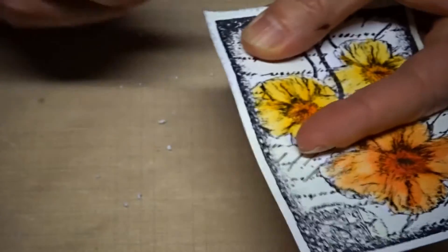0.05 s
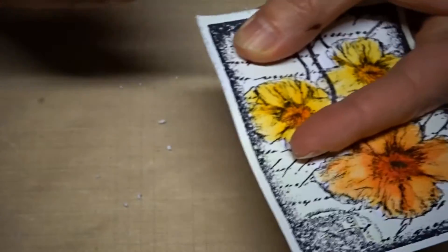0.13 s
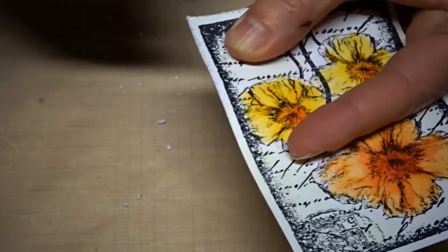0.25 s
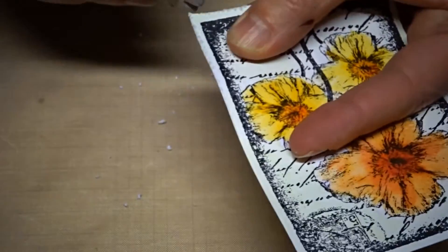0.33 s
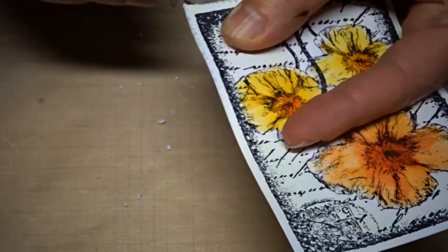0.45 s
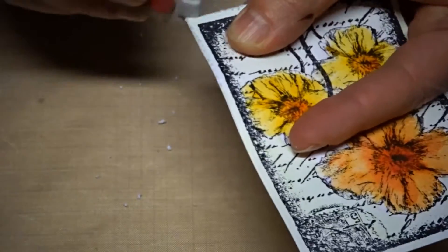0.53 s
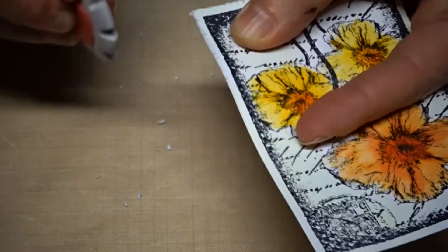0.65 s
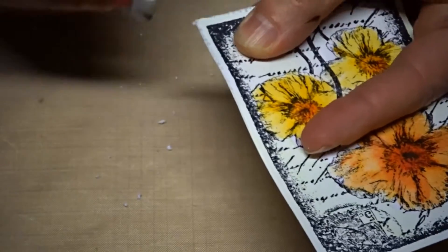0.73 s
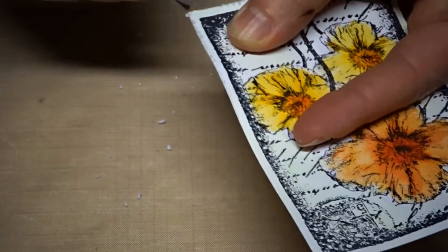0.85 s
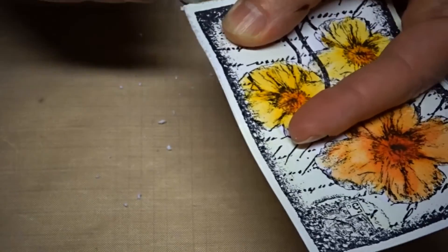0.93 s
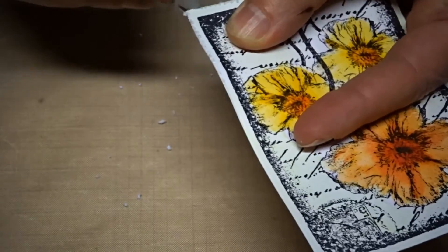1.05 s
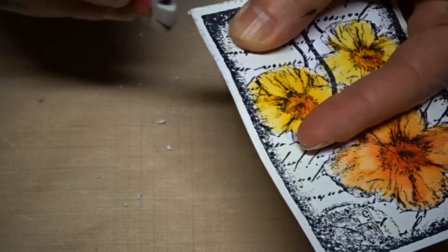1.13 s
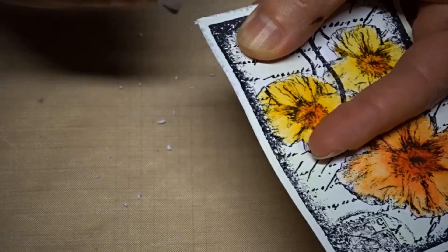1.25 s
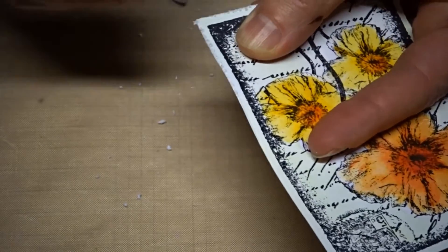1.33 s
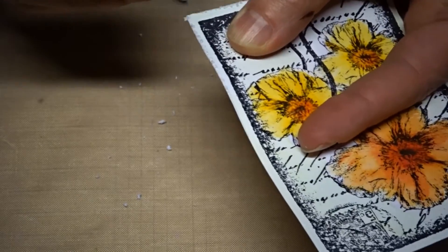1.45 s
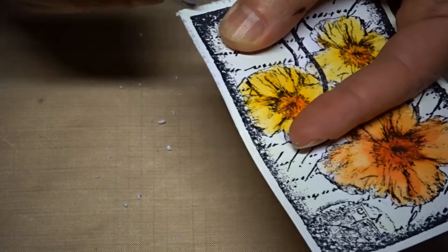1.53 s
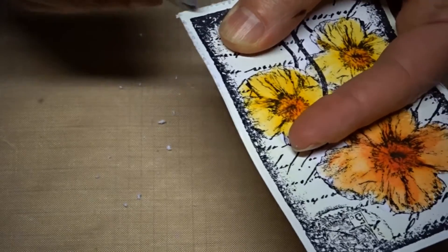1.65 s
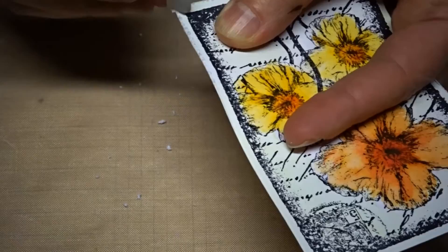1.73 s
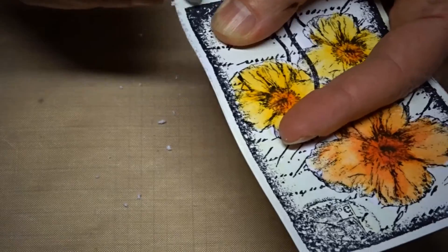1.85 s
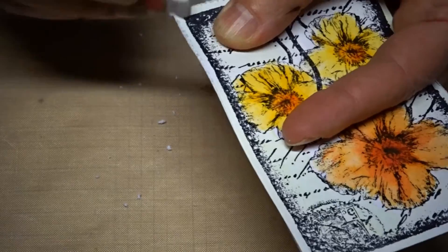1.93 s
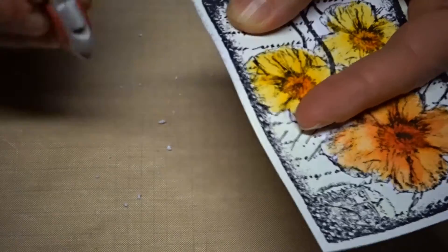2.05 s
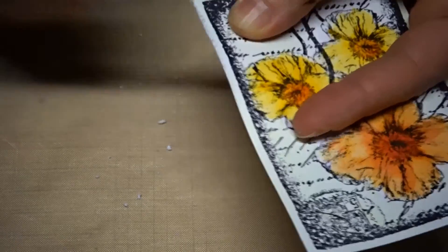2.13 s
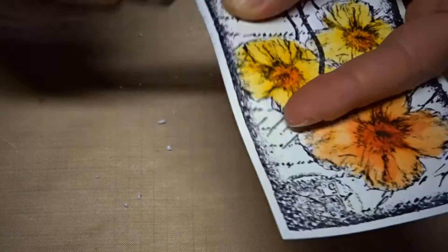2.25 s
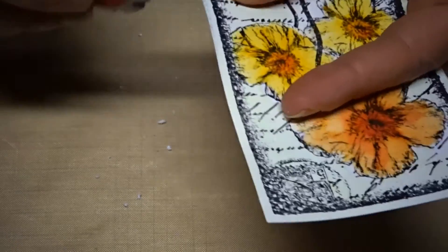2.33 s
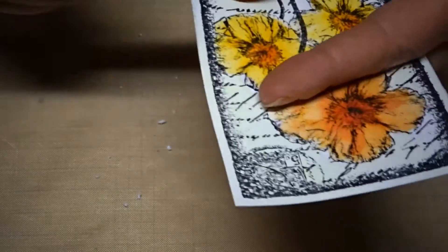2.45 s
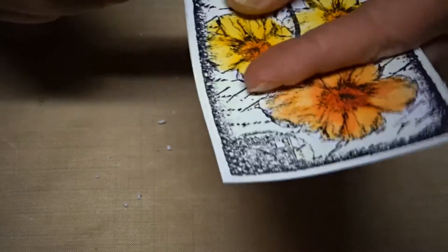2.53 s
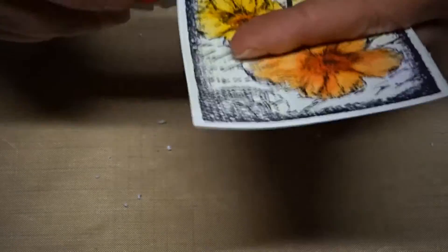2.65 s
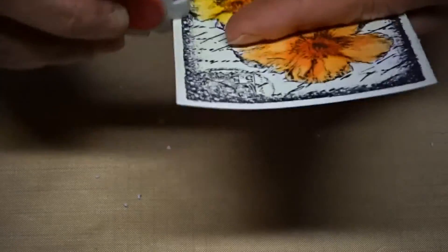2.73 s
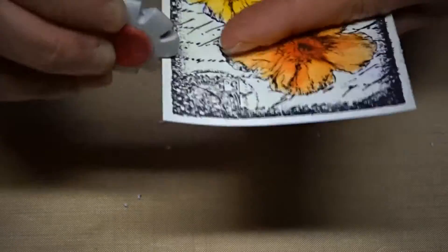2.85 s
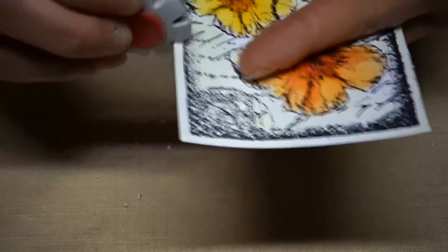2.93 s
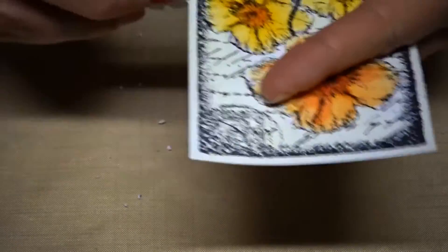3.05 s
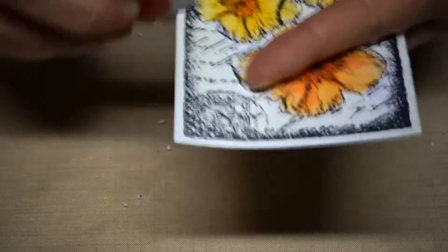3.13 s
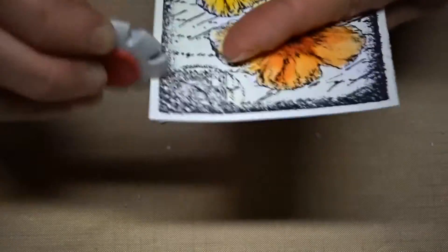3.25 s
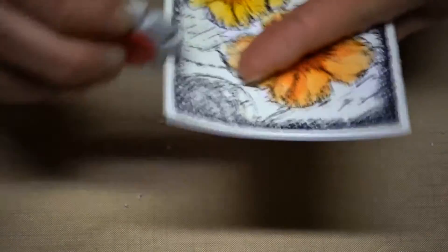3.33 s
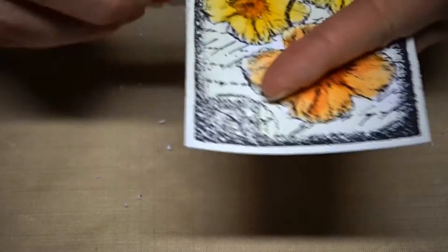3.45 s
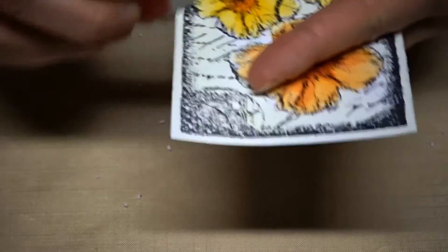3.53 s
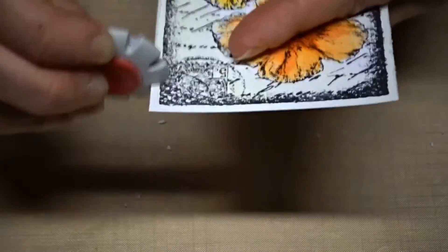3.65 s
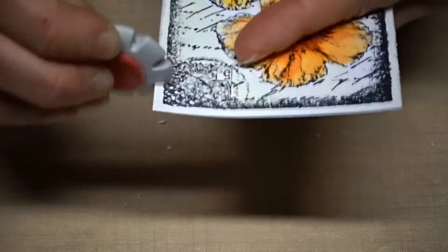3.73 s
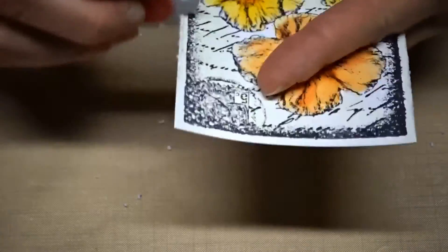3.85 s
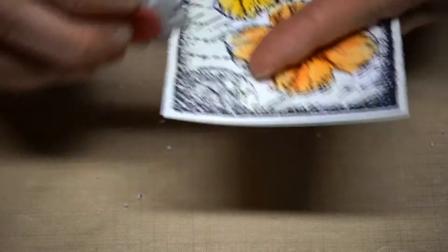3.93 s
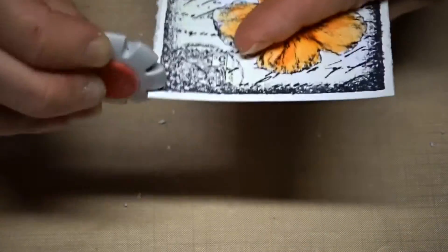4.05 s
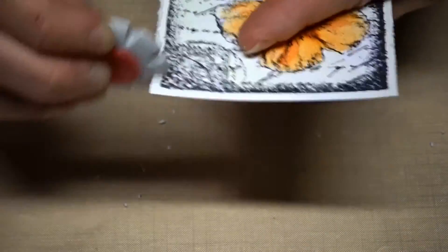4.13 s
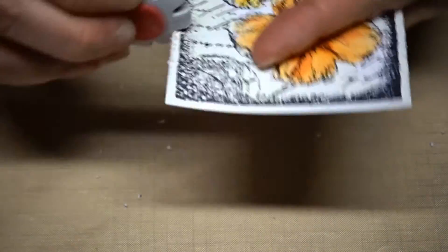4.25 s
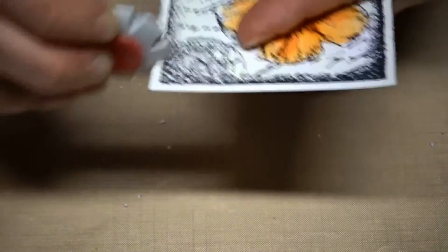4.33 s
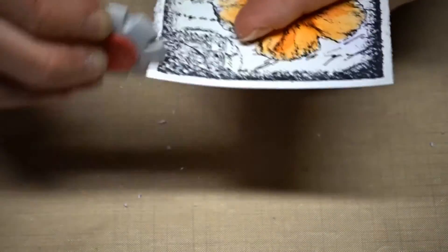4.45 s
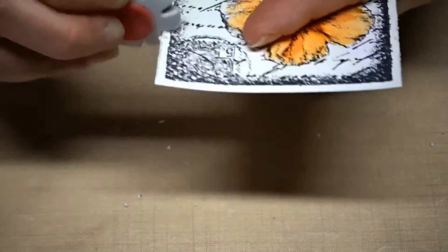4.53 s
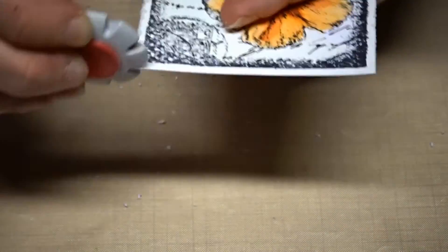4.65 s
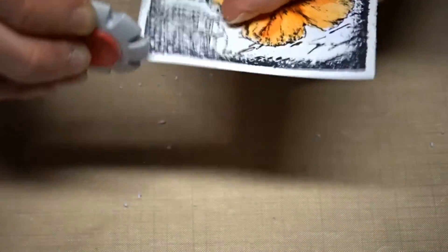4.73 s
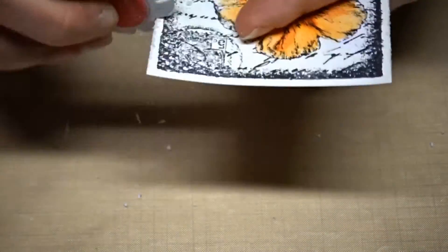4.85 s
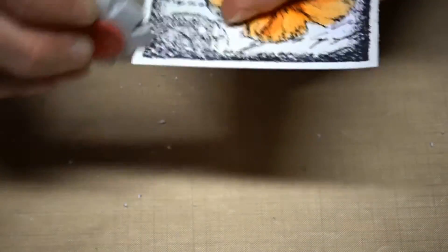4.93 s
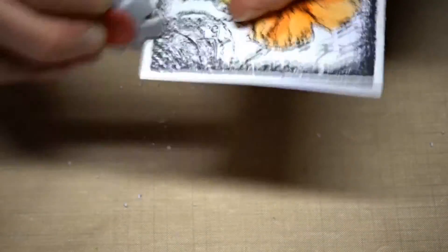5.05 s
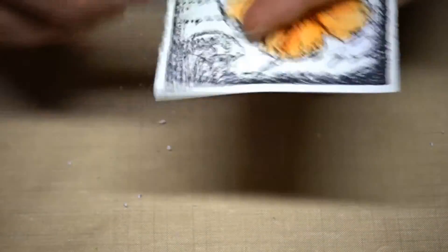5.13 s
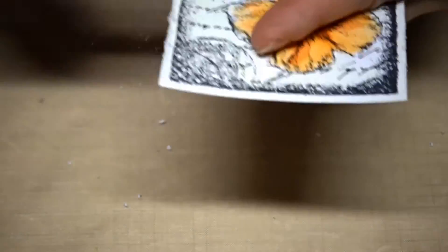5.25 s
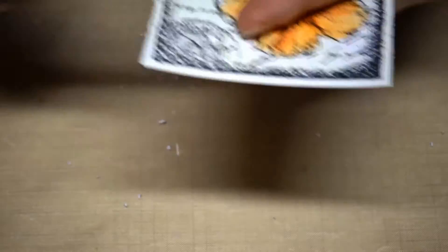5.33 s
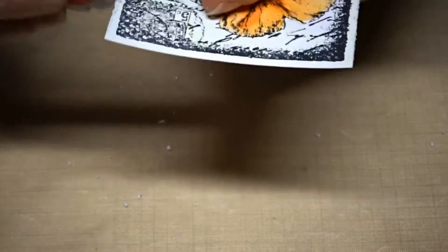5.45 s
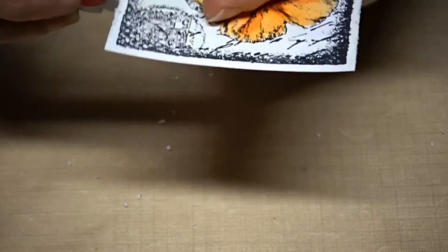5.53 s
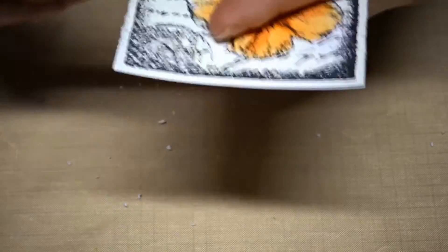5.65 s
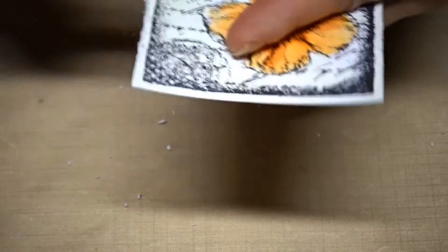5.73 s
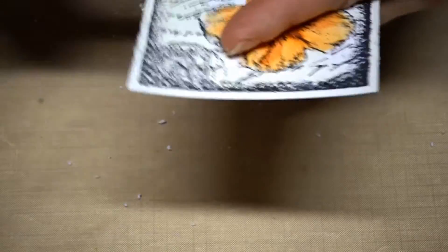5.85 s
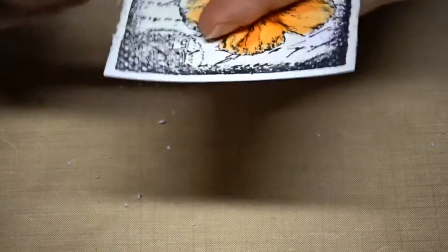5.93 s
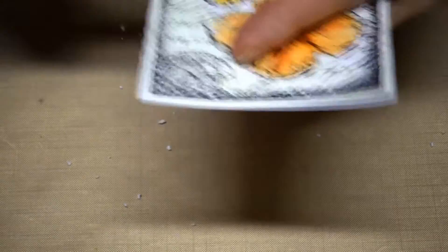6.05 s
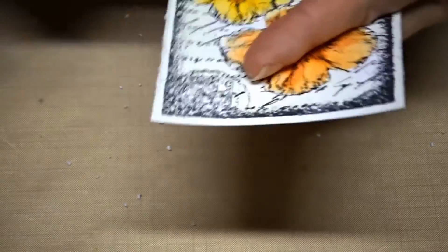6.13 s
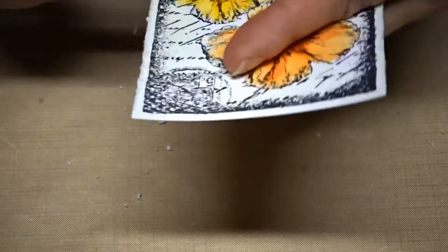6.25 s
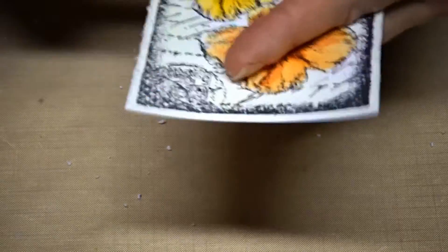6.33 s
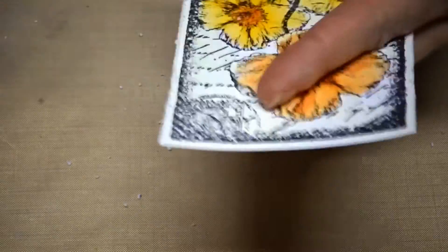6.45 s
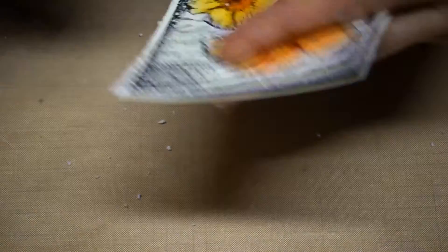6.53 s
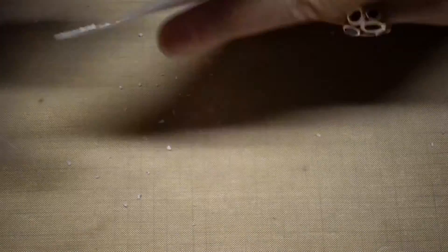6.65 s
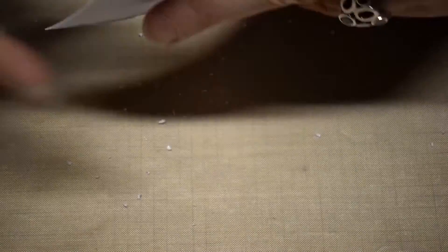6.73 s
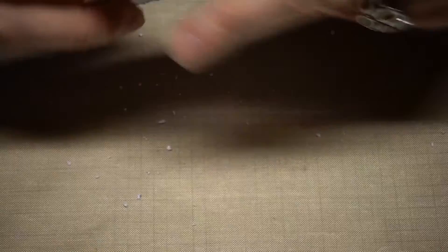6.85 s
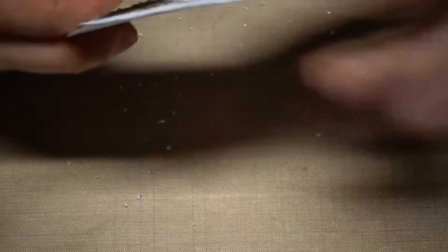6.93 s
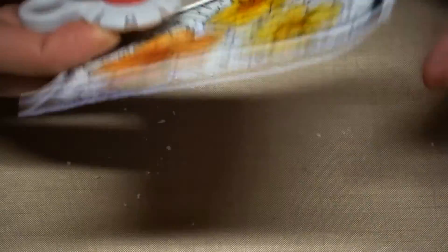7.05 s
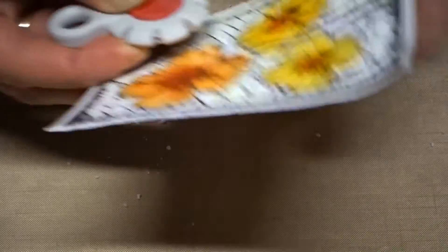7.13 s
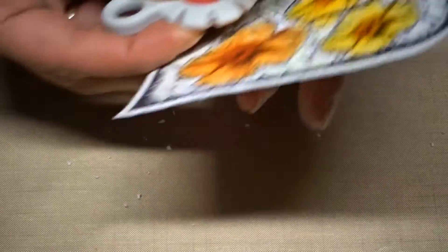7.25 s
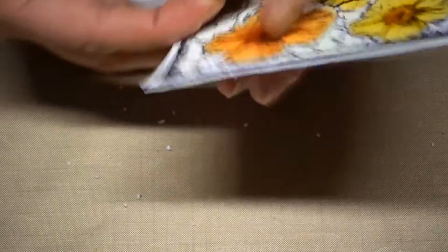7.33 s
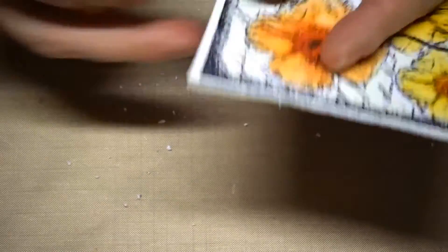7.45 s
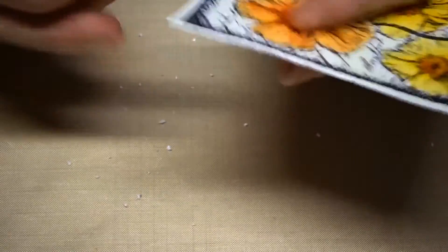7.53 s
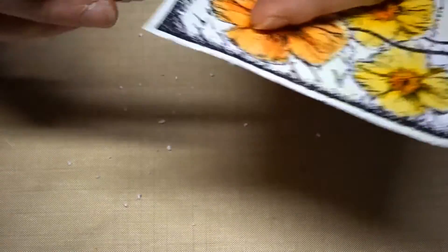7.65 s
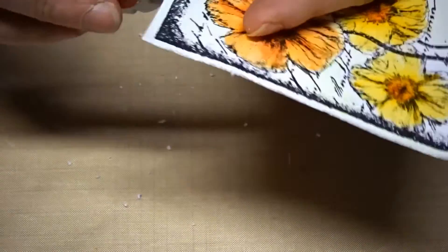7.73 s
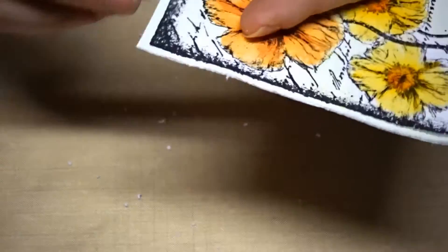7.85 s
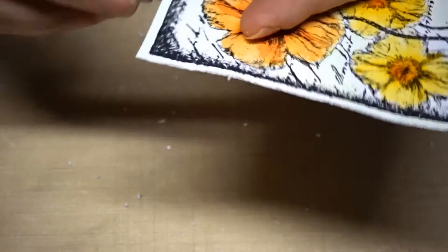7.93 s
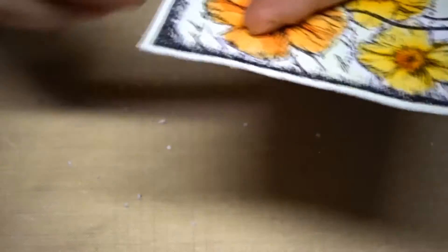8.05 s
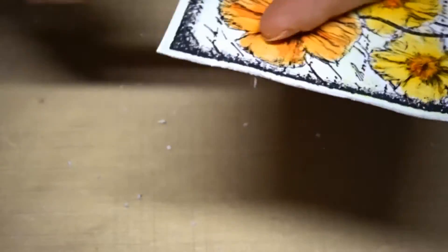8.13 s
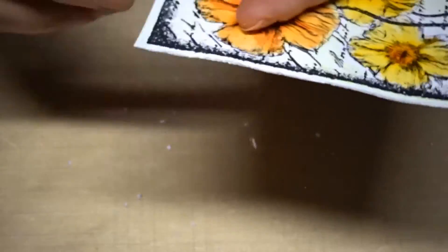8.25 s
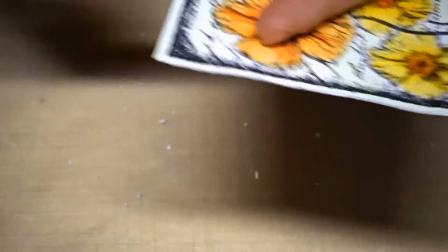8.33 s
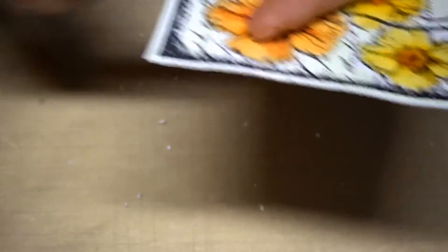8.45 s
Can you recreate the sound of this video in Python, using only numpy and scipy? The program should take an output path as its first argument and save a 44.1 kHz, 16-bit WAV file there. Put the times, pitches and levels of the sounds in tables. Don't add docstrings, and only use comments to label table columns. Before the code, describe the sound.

Light ticks, then short gritty scrapes of a tool fraying a paper card, a pause as the card is turned, and a few last rasps.

```python
import sys
import numpy as np
from scipy import signal
from scipy.fft import rfft, irfft, next_fast_len
from scipy.io import wavfile
from scipy.ndimage import uniform_filter1d, map_coordinates

SR = 44100
rng = np.random.default_rng(int(sys.argv[2]) if len(sys.argv) > 2 else 0)


def magnitude_from_level(level_db):
    exponent = np.asarray(level_db, float) / 20
    return 10 ** exponent


def unload_audio(sound):
    columns = np.transpose(np.atleast_2d(sound))
    steps = np.round(np.clip(columns, -1, 1) * 32767)
    wavfile.write(sys.argv[1], SR, steps.astype(np.int16))


N = 374409

SLIDE_START_S, SLIDE_END_S = 6.69, 7.0
DAMPED_DB = -9


def scrape():
    strokes, handling = contacts()
    shake_db, fizz_db, flex_db, bend_hz = curves(np.concatenate(sorted(strokes + handling)))
    blade = touching(strokes, lead_s=0.0056, release_s=0.011)
    fingers = touching(handling, lead_s=0.0022, release_s=0.17)
    clumps = unit(magnitude_from_level(0.8 * wobble(40) + 1.3 * wobble(160)))
    force = clumps * bites() * magnitude_from_level(shake_db)
    jolts = slips(rate=1500, spread_db=2.0, smooth=0.33)
    t = np.arange(N) / SR
    sliding = (t > SLIDE_START_S) & (t < SLIDE_END_S)
    fizz = torn_fibres(force * magnitude_from_level(fizz_db), jolts, blade, fingers, sliding)
    force = force * (blade + fingers) * magnitude_from_level(DAMPED_DB * sliding)
    bend = bending(force, jolts, bend_hz)
    flex = filtered(force * magnitude_from_level(flex_db) * jolts, modes(FLEX_MODES)) / loudness(modes(FLEX_MODES))
    return magnitude_from_level(2.0) * bend + magnitude_from_level(-6.0) * flex + magnitude_from_level(1.22) * fizz


# t/s, length/s, hardest push level/dB, its place 0-1, best driven mode f/Hz
BLADE_STROKES = [(2.53, 0.14, -53.5, 1, 1720), (2.647, 0.025, -38, 0.1, 1100),
                 (2.678, 0.1, -38.5, 0.33, 2180), (2.772, 0.08, -33.5, 0.88, 925),
                 (2.843, 0.087, -36, 0.17, 1640), (2.975, 0.14, -30.5, 0.33, 1300),
                 (3.178, 0.087, -31.5, 0.95, 1290), (3.259, 0.067, -27.5, 0.65, 1030),
                 (3.404, 0.11, -28, 0.52, 1340), (3.585, 0.16, -31, 0.89, 1130),
                 (3.824, 0.042, -26, 0.37, 1130), (3.883, 0.059, -26, 0.3, 1230),
                 (3.988, 0.078, -31, 0.9, 1250), (4.064, 0.088, -29.5, 0.22, 980),
                 (4.198, 0.098, -28, 0.42, 1010), (4.352, .11, -33, 0.66, 1010),
                 (4.52, 0.083, -34.5, 0.22, 840), (4.653, 0.089, -34, 0.71, 860),
                 (4.831, 0.072, -27.5, 0.2, 1170), (4.952, 0.092, -32.5, 0.59, 820),
                 (5.101, 0.041, -26.5, 0.32, 800), (5.164, 0.07, -29, 1, 1150),
                 (5.25, 0.035, -50, 0.6, 1120),
                 (5.58, 0.039, -56.5, .6, 920), (5.637, 0.013, -47, .6, 1000),
                 (5.679, 0.18, -39, 0.91, 1110), (5.927, 0.078, -31.5, 0.2, 1224),
                 (6.076, 0.12, -27, 0.64, 950), (6.242, 0.066, -37.5, 0.15, 1240),
                 (6.366, 0.018, -48, 0.79, 1410), (6.384, 0.015, -33, 0.18, 700),
                 (6.402, 0.055, -29, 0.76, 1030), (8.104, 0.089, -37.5, 0.86, 1050),
                 (8.237, 0.084, -40, .38, 1340), (8.364, 0.078, -31.5, 0.91, 1300),
                 (8.45, 0.026, -41, .1, 1340)]
# t/s, length/s, hardest push level/dB, its place 0-1, best driven f/Hz
FINGER_BRUSHES = [(0.0, 0.011, -40, 0.28, 1260), (0.012, 0.014, -40, 0.44, 1650),
                  (.619, 0.022, -49, 0.73, 2000), (1.165, 0.039, -56.5, 0.31, 1570),
                  (1.76, 0.034, -51.5, 0.12, 1520), (2.0, 0.025, -49, 0.52, 1600),
                  (2.028, 0.014, -42, 0.24, 1600), (2.3, 0.063, -44.5, 0.3, 1050),
                  (6.59, 0.11, -48, 0.07, 1050), (7.318, 0.071, -54, 0.2, 560),
                  (7.375, 0.049, -56.5, 0.57, 1400), (7.42, 0.063, -39.5, 0.03, 1080),
                  (7.484, 0.055, -42, 0.12, 1050), (7.59, 0.05, -46, 0.36, 980),
                  (7.665, 0.057, -53, 0.03, 1100), (7.765, 0.13, -55.5, 0, 1140),
                  (7.897, 0.095, -49, 0.15, 1070), (8.03, 0.035, -55, 0.1, 750)]
# t/s, length/s, hardest push level/dB, its place 0-1, best driven f/Hz
SKIN_SWISHES = [
    (.58, 0.031, -67, .6, 1520),
    (.7, 0.064, -73, 0.28, 1790),
    (1.885, 0.045, -64, 0.45, 1610),
    (2.262, 0.019, -68, 0.76, 1490),
    (6.7, 0.041, -63.5, 0.36, 1690),
    (6.87, 0.059, -61, 0.98, 1670),
    (6.926, 0.045, -52, 0.63, 1900),
    (7.0, 0.12, -62.5, 0.71, 1470),
    (7.105, 0.058, -59.5, .5, 1700),
    (7.16, 0.061, -64.5, .3, 1700),
]
# t/s, fibre fizz level/dB, low flex level/dB, both over the shake
CUT_AND_GRIP = [(2.5, -5.5, -33), (2.68, -1.5, -20.5), (2.85, -4.5, -17.5), (3.2, -9, -14),
                (3.6, -7.5, -14.5), (3.9, -10.5, -10), (4.2, -13.5, -14.5), (4.6, -9.5, -1),
                (4.85, -15, -12.5), (5.1, -14, -3), (5.25, -7.5, -8.5), (5.6, -6.5, 1), (6.0, -12.5, -9),
                (6.2, -7, -5.5), (6.27, -2.5, -15), (6.5, -12, -6), (8.1, -5, -10.5), (8.49, 0, -18.5)]
FINGER_FIZZ_DB, FINGER_FLEX_DB = -8, -3.5
SKIN_FIZZ_DB, SKIN_FLEX_DB = -2.5, -14
BLADE = dict(start_db=-8.5, end_db=-12.5, ease_s=0.018, bow=1.35, sag_oct=0.059,
             flex_db_per_oct=20, fizz_db_per_oct=1, fray_db=2, slack_db=5)
FINGERS = dict(start_db=-20.5, end_db=-18.5, ease_s=0.0076, bow=0.41, sag_oct=0.05,
               flex_db_per_oct=-6, fizz_db_per_oct=15.5, fray_db=6.5, slack_db=1.5)
SKIN = dict(start_db=-6, end_db=-7, ease_s=0.02, bow=1.5, sag_oct=0.05,
            flex_db_per_oct=-12, fizz_db_per_oct=4, fray_db=1, slack_db=1.5)


def contacts():
    s, *cols = np.transpose(CUT_AND_GRIP)
    strokes = pushes(BLADE_STROKES, lambda t: [np.interp(t, s, c) for c in cols], **BLADE)
    brushes = pushes(FINGER_BRUSHES, lambda t: (FINGER_FIZZ_DB, FINGER_FLEX_DB), **FINGERS)
    swishes = pushes(SKIN_SWISHES, lambda t: (SKIN_FIZZ_DB, SKIN_FLEX_DB), **SKIN)
    return strokes, brushes + swishes


def pushes(rows, hold, start_db, end_db, ease_s, bow, sag_oct, flex_db_per_oct, fizz_db_per_oct, fray_db, slack_db):
    out = []
    for s, length, db, place, hz in rows:
        rise = length * np.clip(place, 0.02, 0.95)
        octaves = np.log2(hz / 1000)
        fizz_db, flex_db = hold(s + rise)
        fizz_db = fizz_db + fizz_db_per_oct * octaves
        flex_db = flex_db + flex_db_per_oct * octaves

        def point(u, full_db, span, fray):
            push_db = db + full_db * (1 - np.exp(-abs(span) / ease_s)) * u ** bow
            best_hz = hz * 2 ** (sag_oct * (u - 0.4))
            return s + rise + u * span, push_db, fizz_db + u * fray, flex_db + u * slack_db, best_hz

        before = [point(u, start_db, -rise, 0) for u in (1, 2 / 3, 1 / 3)]
        after = [point(u, end_db, length - rise, fray_db) for u in (0, 1 / 3, 2 / 3, 1)]
        out.append(before + after)
    return out


def touching(drags, lead_s, release_s):
    touch = np.zeros(N)
    for rows in drags:
        touch[int(rows[0][0] * SR):int(rows[-1][0] * SR)] = 1
    fade = lambda x, s: signal.lfilter([1 / (s * SR)], [1, 1 / (s * SR) - 1], x)
    trail = 0.66 * fade(touch, release_s)
    approach = 0.33 * fade(touch[::-1], lead_s)[::-1]
    return uniform_filter1d(np.maximum(touch, np.maximum(trail, approach)), size=110)


# t/s, slip level/dB over the rasp
BLADE_SLIPS = [(2.647, 5), (2.66, 4), (2.678, 8), (2.691, 1), (2.71, 5.5), (2.718, 1), (2.744, 10),
               (2.763, 14), (2.779, 8), (2.789, 0), (2.822, 2), (2.851, 3), (2.868, 5), (2.893, 16),
               (2.988, 5), (3.018, 4.5), (3.192, 8.5), (3.206, 5), (3.225, -4), (3.249, 2), (3.297, -0.5),
               (3.316, 8), (3.422, 11.5), (3.433, 8), (3.466, 6), (3.495, 9.5), (3.601, 3), (3.644, 6),
               (3.705, 6), (3.842, 6), (4.0, 0), (4.05, 3), (4.105, -0.5), (4.366, -7), (4.378, 0),
               (4.389, 1.5), (4.403, 11), (4.529, 2), (4.569, 5), (4.676, 4), (4.732, 11), (4.984, 4),
               (5.13, 9), (5.212, 3), (5.229, -3), (6.089, 0), (6.1, 5), (6.121, -0.5), (6.15, 6.5),
               (6.388, -1), (6.404, 7), (6.408, 10), (6.411, 7.5), (6.419, 5.5), (6.428, 9), (6.436, 7.5),
               (6.449, 4),
               (2.997, 0), (3.04, 3), (3.108, 6), (4.413, 2), (4.444, 7), (4.585, 0), (4.656, 3), (5.102, 4),
              (5.112, 4), (5.122, 3), (4.69, 4), (4.717, 2.8), (4.962, 3), (5.001, 0), (5.683, 3),
              (5.72, 4), (5.739, 10), (5.754, 14), (5.778, 3), (5.798, 9), (5.807, 1), (5.817, 4),
              (5.832, 15), (5.856, 5), (5.932, 6), (5.946, 1), (5.965, 4), (5.987, 7), (6.13, 3),
              (6.162, 5), (6.178, 6), (6.194, 6), (6.256, 2), (6.303, 9), (8.113, 7), (8.131, 11),
              (8.145, 4), (8.16, 6), (8.264, -1.5), (8.366, 3), (8.387, -3), (8.421, 5), (8.447, 1)]
HANG_DB, HANG_S, SLIP_S = -9, 0.0035, 0.005


def bites():
    hang, slip = np.zeros((2, N))
    for s, db in BLADE_SLIPS:
        hang[round(s * SR)] = HANG_DB
        slip[round(s * SR) + 1] = db
    fade = lambda x, s: signal.lfilter([1], [1, 1 / (s * SR) - 1], x)
    hanging = fade(hang[::-1], HANG_S)[::-1] * (0.5 - np.clip(fade(slip, 0.00062), 0, 1))
    return magnitude_from_level(hanging + fade(slip, SLIP_S))


def slips(rate, spread_db, smooth):
    when, size, sign = rng.random((3, N))
    jolts = (when < rate / SR) * magnitude_from_level(-spread_db * np.log(size + 0.0023)) * np.sign(sign - 0.5)
    smooth = np.clip(smooth, 0, 1)
    return np.sqrt(1 - smooth) * unit(jolts) + np.sqrt(smooth) * rng.standard_normal(N)


# f/Hz, width f/Hz, level/dB
CARD_MODES = [(679, 139, 0.5), (855, 183, 3.5), (1050, 433, -2.5), (1340, 252, 0.5), (1564, 145, 0),
              (2070, 380, 0), (2465, 177, -4)]
# f/Hz, width f/Hz, level/dB
FLEX_MODES = [(210.2, 31, -5), (228.7, 82, -6), (326.7, 17.4, -1.5), (421.2, 25.8, 5), (448, 297, -6.5)]
FOCUS_DB = -24
SPILL, SPILL_DB_PER_OCT = 0.2, -0.5


def bending(force, jolts, bend_hz):
    drive = []
    for hz, _, _ in CARD_MODES:
        focus = magnitude_from_level(FOCUS_DB * np.log2(hz / bend_hz) ** 2 + 1.06 * wobble(18))
        drive.append(focus + SPILL * magnitude_from_level(SPILL_DB_PER_OCT * np.log2(hz / 1000)))
    drive = np.array(drive)
    power = np.array([loudness(modes([mode])) ** 2 for mode in CARD_MODES])
    drive /= np.sqrt(power @ drive ** 2)
    each = lambda f: [(-1) ** k * modes([mode])(f) for k, mode in enumerate(CARD_MODES)]
    shaking = force * patchy(jolts, size=512, deep_db=2.0, bins=2, frames=3)
    return filtered(shaking * drive, each).sum(axis=0)


# f/Hz, level/dB per Hz
LONG_EDGE = [(1530, -15.5), (2300, -11), (3100, -3.5), (3400, -3), (4210, -0.5), (4670, -5), (5580, -12.5),
             (6100, -12), (9520, -24.5), (11100, -21.5), (14200, -26.5), (15300, -31)]
# f/Hz, level/dB per Hz
TILTED_EDGE = [(1500, -13), (2400, -5), (2900, -6.5), (3500, -7.5), (5100, 0), (5600, -19.5), (7000, -11),
               (10000, -20.5), (15300, -29)]
# f/Hz, level/dB per Hz
SHORT_EDGE = [(1410, -20), (2400, -7), (2590, -1), (3430, -13.5), (5290, -7), (6730, -15.5), (7800, -8),
              (8690, -16), (10100, -14), (13900, -13), (15300, -20)]
# f/Hz, level/dB per Hz
BRUSHED_CARD = [(1120, -27), (1900, 1.5), (2280, -4.5), (2670, -4), (3100, -9.5), (4630, -6), (6910, -13),
                (7610, -10), (12500, -20.5), (13900, -17), (15300, -34)]
# f/Hz, level/dB per Hz
SLIDING_SKIN = [(710, -37), (1300, -12), (2000, -5), (2450, 4), (3000, -9), (4740, -9), (6960, -14),
                (15300, -20)]
# t/s, share of the higher rasp 0-1
BLADE_TILT = [(2.5, 1), (2.78, 0.4), (2.9, 0.25), (3.1, 0), (3.3, 0.16), (3.5, 0.2), (3.9, 0.1), (4.3, 0),
              (4.7, 0), (5.0, 0), (5.2, 0.5), (5.8, 0.04), (6.15, 0.26), (6.26, 1), (6.45, 0.8)]
# t/s, treble level/dB
CARD_FACING = [(2.5, -2), (3.3, -1), (4.0, 2.5), (5.2, 3.5), (5.7, 4), (6.1, -2.5), (6.6, -19), (6.9, 0.5),
               (8.0, -14), (8.49, -11)]
TURNED_S, BEAM_HZ, SLIDE_DB = 7.5, 7300, 2


def torn_fibres(force, jolts, blade, fingers, sliding):
    tears = 0.5 * jolts + 0.75 * slips(rate=4500, spread_db=4.5, smooth=0.28)
    tears = patchy(tears, size=128, deep_db=2.5, bins=3, frames=2)
    tears = patchy(tears, size=1024, deep_db=1.5, bins=22, frames=6)
    skin = sum(np.roll(tears, k * SR) for k in (1, 2, 3))
    skin = patchy(unit(skin), size=1024, deep_db=3.5, bins=30, frames=4)
    tilt = np.clip(curves(BLADE_TILT)[0], 0, 1)
    t = np.arange(N) / SR
    turned = t > TURNED_S
    cut = tears * blade
    brushing = np.where(t > SLIDE_START_S, skin, tears)
    layers = np.array([cut * ~turned * (1 - tilt), cut * ~turned * tilt, cut * turned,
                       magnitude_from_level(0.14) * fingers * ~sliding * brushing, magnitude_from_level(SLIDE_DB) * fingers * sliding * skin])

    def hisses(hz):
        tables = LONG_EDGE, TILTED_EDGE, SHORT_EDGE, BRUSHED_CARD, SLIDING_SKIN
        return [magnitude_from_level(along(table, hz)) / loudness(lambda f: magnitude_from_level(along(table, f))) for table in tables]

    fizz = filtered(force * layers, hisses).sum(axis=0)
    treble = filtered(fizz, lambda hz: 1 / (1 + (BEAM_HZ / (hz + 1)) ** 6))
    return fizz + (magnitude_from_level(curves(CARD_FACING)[0]) - 1) * treble


def patchy(x, size, deep_db, bins, frames):
    z = signal.stft(x, nperseg=size)[2]
    field = uniform_filter1d(uniform_filter1d(rng.standard_normal(z.shape), bins, 0), frames, 1)
    return signal.istft(z * unit(magnitude_from_level(deep_db * unit(field))), nperseg=size)[1][:N]


# t/s, peak level/dB, crack level/dB relative to it, ring f/Hz
TOOL_TAPS = [
    (0.014, -32, -11, 2000),
    (0.0215, -37.5, -16, 1020),
    (0.631, -38.5, -1.5, 2020),
    (1.181, -55, -16, 2160),
    (1.762, -62, -1, 1570),
    (2.01, -46, -5, 2140),
    (2.038, -26, -9.5, 1420),
    (2.319, -45, -4, 1340),
    (2.326, -27.5, -9, 800),
]
# t/s, peak level/dB, crack level/dB relative to it, ring f/Hz
LONG_EDGE_SNAGS = [(2.649, -30.5, -5.5, 950), (2.68, -34, -1, 654), (2.69, -37, -1, 2400),
                   (2.718, -27, -15, 2030), (2.985, -34, -20, 1510), (3.226, -23, -14, 1280),
                   (3.317, -30, -11, 1270), (3.405, -12.5, -9, 1400), (3.495, -31, -11, 1440),
                   (3.691, -26, -3, 1140), (3.824, -30.5, 2.5, 1320), (3.885, -14.5, -2.5, 1610),
                   (4.067, -30, -10, 1100), (4.202, -47, -20.5, 690), (4.395, -27, -36, 1010),
                   (4.522, -33, -11, 830), (4.572, -25, -11, 1030), (4.833, -12, -15.5, 1110),
                   (4.961, -32.5, -18, 785), (5.104, -25, -21, 780), (5.135, -22, -19, 775),
                   (5.175, -19.5, 1, 950),
                   (5.612, -68, -11, 900), (5.64, -47, -11, 1000), (5.651, -38, -20, 800),
                 (5.682, -35.5, -3, 1310), (5.74, -30, -5.5, 1380), (5.754, -26, -13, 790),
                 (5.778, -29, -4.5, 1300), (5.797, -29, -8, 900), (5.82, -32, -3, 1300),
                 (5.809, -23.5, -10, 1340), (5.831, -25, -19, 740), (5.854, -24, -12, 1200),
                 (5.932, -29.5, -16, 1390), (6.078, -28, -9.5, 746), (6.122, -17.5, -23, 1260),
                 (6.136, -36, -8.5, 900), (6.162, -26, -6, 1200), (6.172, -24, -5, 795),
                 (6.148, -21, -19, 810), (6.246, -33.5, 2, 1300), (6.387, -23.5, -11, 645),
                 (6.403, -26, -11, 1370), (6.411, -29, -17, 675), (6.419, -26.5, -1, 880),
                 (6.426, -20.5, -6, 855), (6.449, -20, -4.5, 1390)]
# t/s, peak level/dB, crack level/dB relative to it, ring f/Hz
TURN_CLICKS = [(6.597, -43, -23, 1430), (6.97, -41.5, -6, 725), (7.169, -49, -3, 2410),
               (7.32, -56, -12, 630), (7.422, -26, -12, 970), (7.452, -31, -9, 760), (7.486, -32, -8, 710),
               (7.669, -36.5, -14, 760), (7.767, -33.5, -29, 1040), (7.9, -34, -32, 880),
               (7.929, -38, -22, 760), (8.035, -45.5, -14, 720)]
# t/s, peak level/dB, crack level/dB relative to it, ring f/Hz
RUN_THREE_SNAGS = [
    (8.112, -37, -20, 830),
    (8.131, -42.5, 9.5, 1240),
    (8.365, -35, -15, 1410),
    (8.421, -20, -12, 1370),
    (8.4454, -26.5, 2.5, 1530),
]


def snags():
    ring, push, snap = np.zeros((3, N + SR))
    t = np.arange(700) / SR
    every = TOOL_TAPS + LONG_EDGE_SNAGS + TURN_CLICKS + RUN_THREE_SNAGS
    bursts = rng.standard_normal((len(every), 2, len(t)))
    for (s, db, crack_db, near_hz), (low, high) in zip(every, bursts):
        burst = low * magnitude_from_level(-60 * t / 0.0066)
        card = np.zeros(len(t))
        for k, (hz, width, level) in enumerate(CARD_MODES):
            gain = (-1) ** k * magnitude_from_level(level - 6.2 * np.log2(hz / near_hz) ** 2)
            card += gain * np.exp(-3.2 * np.pi * width * t) * np.sin(2 * np.pi * hz * t)
        knock = np.convolve(burst, card)[:len(t)]
        here = slice(round(s * SR), round(s * SR) + len(t))
        ring[here] += magnitude_from_level(db + 1.5) * knock / np.abs(knock).max()
        push[here] += magnitude_from_level(db + 7.5) * burst
        snap[here] += magnitude_from_level(db + crack_db - 1.0 - 60 * t / 0.013) * high
    fibre = lambda hz: magnitude_from_level(along(LONG_EDGE, hz) + 1.7 * np.log2(hz / 4000 + 0.1))
    return ring[:N] + filtered(push[:N], modes(FLEX_MODES)) + filtered(snap[:N], fibre) / loudness(fibre)


# f/Hz, side minus mid level/dB
STEREO_WIDTH = [(300, -49), (1000, -31), (2000, -20.5), (4000, -17), (8000, -11.5), (13000, -20)]
LEAN_DB = 0.25


def placed(x):
    scatter = rng.standard_normal((3, 300)) * magnitude_from_level(-60 * np.arange(300) / SR / 0.0022)
    moving = sum(wobble(8.6) * signal.oaconvolve(x, path / np.linalg.norm(path))[:N] for path in scatter)
    side = filtered(moving, lambda hz: magnitude_from_level(along(STEREO_WIDTH, hz) + 0.5))
    return np.array([x + side, x - side]) * magnitude_from_level([[-LEAN_DB], [LEAN_DB]])


# f/Hz, t60/s
ROOM_DECAY = [(300, 0.27), (1500, 0.29), (5000, 0.29), (12000, 0.3)]
# f/Hz, level/dB
ROOM_LEVEL = [(300, -8), (1500, -11), (5000, -12), (12000, -7)]
SHIFTS_PER_S = 4.3


def room(x):
    hz, t, z = signal.stft(rng.standard_normal((3, 2, SR // 2)), SR, nperseg=256)
    t60 = along(ROOM_DECAY, hz)[:, None]
    decay = magnitude_from_level(-60 * t / t60) * np.sqrt(6 * np.log(10) / t60 / SR)
    tails = signal.istft(z * decay, SR, nperseg=256)[1]
    turn = 2 * np.pi * (SHIFTS_PER_S * np.arange(N) / SR + np.arange(3)[:, None] / 3)
    shares = np.pad(x * np.cos(turn) * np.sqrt(2 / 3), ((0, 0), (220, 0)))
    mid, side = signal.fftconvolve(shares[:, None], tails, axes=2).sum(axis=0)[:, :N]
    side = filtered(side, lambda f: magnitude_from_level(along(STEREO_WIDTH, f) + 14.5))
    return filtered(np.array([mid + side, mid - side]), lambda f: magnitude_from_level(along(ROOM_LEVEL, f)))


# f/Hz, level/dB per Hz
AIR_NOISE = [(24, -42), (40, -10.5), (103, -22.5), (126, -19), (165, -14.5), (366, -16.5), (395, -14),
             (519, -17), (773, -18.5), (1240, -22), (1340, -20.5), (2680, -27), (15300, -39.5)]
# f/Hz, likeness 0-1
AIR_LIKENESS = [(20, .99), (60, 0.93), (130, 0.83), (290, 0.67), (640, 0.19), (1400, 0)]
# t/s, level/dB
SLEEVE_STIR = [(0, 3.5), (.4, 1), (1.7, 0.5), (2.4, 4.5), (5.4, 4), (6.8, 4), (7.3, 3.5), (8.49, 2.5)]
# t/s, f/Hz, level/dB
FAR_MOTOR = [
    (1.7, 127.5, -83.5),
    (2.304, 126.6, -68.5),
    (3.0, 146.3, -70),
]
AIR_DB = -70
HUM_HZ, HUM_WIDTH_HZ, HUM_DB = 100.5, 12, -70.5


def background():
    turn = lambda hz: np.arccos(np.clip(along(AIR_LIKENESS, hz), -1, 1)) / 2
    colour = lambda hz: magnitude_from_level(along(AIR_NOISE, hz)) * [np.cos(turn(hz)), np.sin(turn(hz))]
    mid, side = filtered(rng.standard_normal((2, N)), colour)
    air_db = AIR_DB + curves(SLEEVE_STIR)[0] + 0.088 * wobble(0.89)
    air = magnitude_from_level(air_db) * np.array([mid + side, mid - side]) / np.std(mid)
    unsteady = filtered(rng.standard_normal(N), modes([(HUM_HZ, HUM_WIDTH_HZ, 0)]))
    hum = magnitude_from_level(HUM_DB) * unit(unsteady + 0.0081 * np.sin(2 * np.pi * HUM_HZ * np.arange(N) / SR))
    motor_hz, motor_db = curves([(1.4, 130, -100), *FAR_MOTOR, (3.3, 135, -100)])
    motor = np.sqrt(2) * magnitude_from_level(motor_db + 2.4 * wobble(13.0)) * np.sin(2 * np.pi * np.cumsum(motor_hz) / SR)
    return air + hum + motor


def unit(x):
    return x / np.sqrt(np.mean(x ** 2) + 1e-20)


def along(points, hz):
    f, v = np.transpose(points)
    return np.interp(np.log(hz + 1), np.log(f + 1), v)


def curves(rows):
    s, *cols = np.transpose(rows)
    return [np.interp(np.arange(N) / SR, s, c) for c in cols]


def wobble(rate):
    knots = rng.standard_normal(int(N * rate / SR) + 4)
    return map_coordinates(knots, [np.arange(N) * rate / SR])


def filtered(x, response):
    m = next_fast_len(N + SR // 2)
    return irfft(rfft(x, m) * response(np.fft.rfftfreq(m, 1 / SR)), m)[..., :N]


def modes(table):
    return lambda f: sum((-1) ** k * magnitude_from_level(db) * 1j * f * w / (c * c - f * f + 1j * f * w)
                         for k, (c, w, db) in enumerate(table))


def loudness(response):
    return np.sqrt(np.mean(np.abs(response(np.linspace(0, SR / 2, 4096))) ** 2))


def scene():
    card = filtered(scrape() + snags(), lambda hz: (1j * hz / (1j * hz + 130)) ** 2)
    return placed(card) + room(card) + background()


def low_pass(x):
    return signal.sosfilt(signal.butter(12, 16310, fs=SR, output="sos"), x)


def record(dry):
    mix = filtered(dry, lambda hz: hz < 15350)
    return low_pass(mix)


dry = scene()
out = record(dry)
unload_audio(out)
```